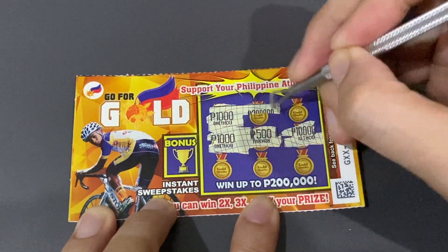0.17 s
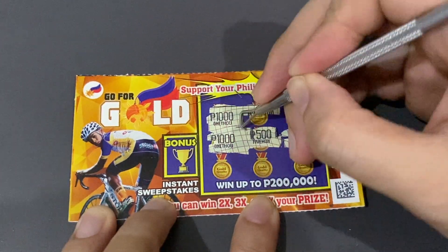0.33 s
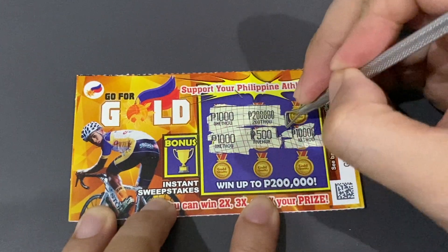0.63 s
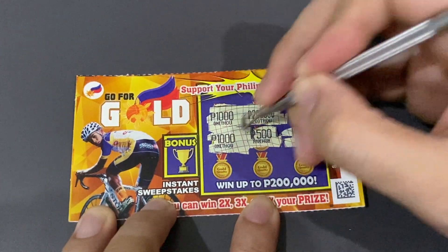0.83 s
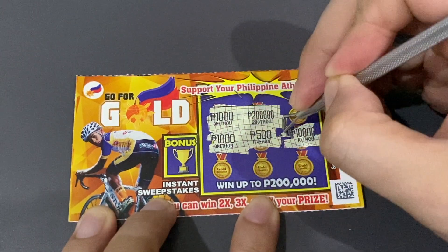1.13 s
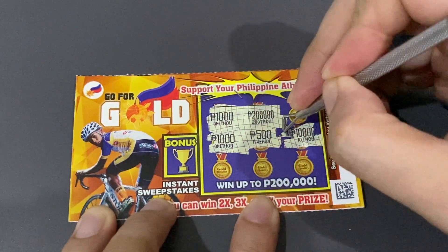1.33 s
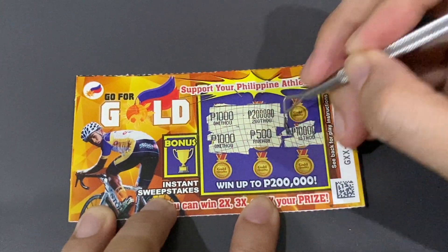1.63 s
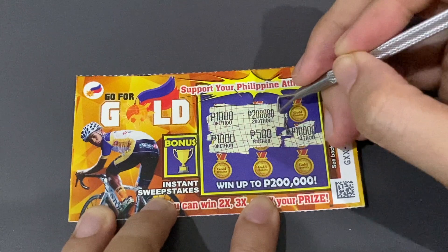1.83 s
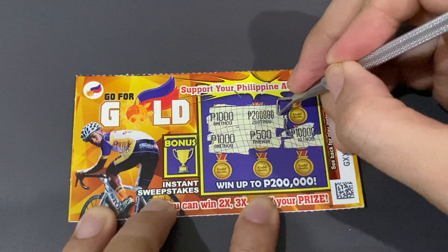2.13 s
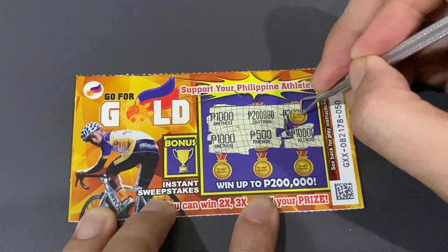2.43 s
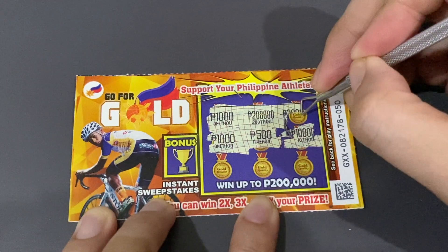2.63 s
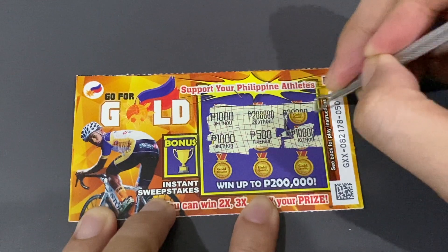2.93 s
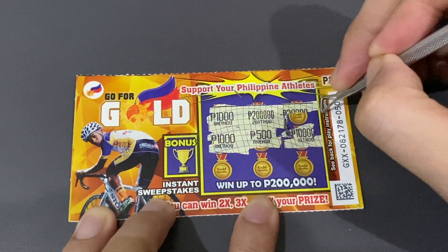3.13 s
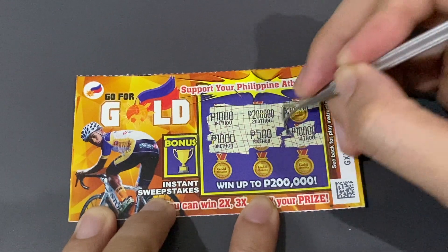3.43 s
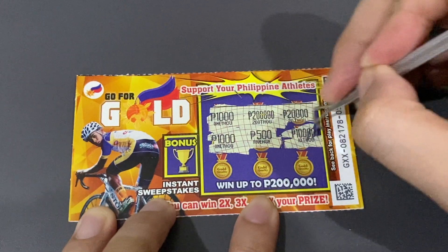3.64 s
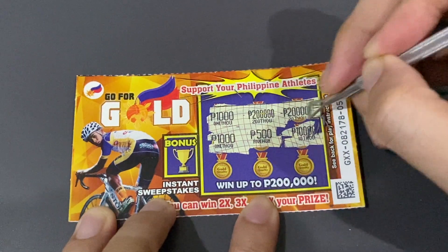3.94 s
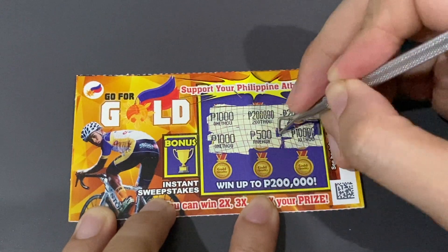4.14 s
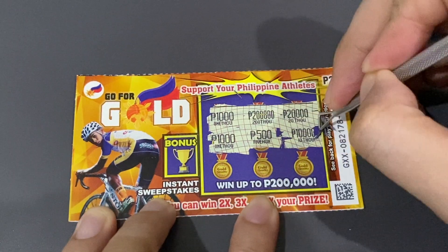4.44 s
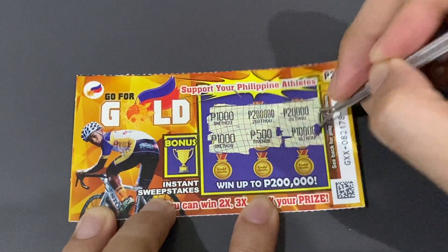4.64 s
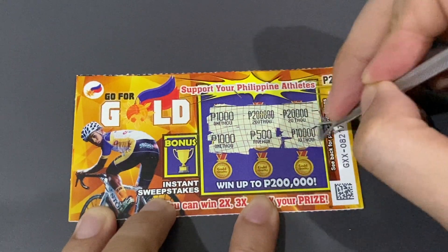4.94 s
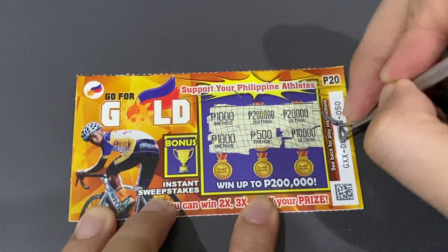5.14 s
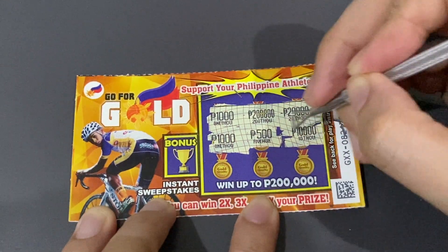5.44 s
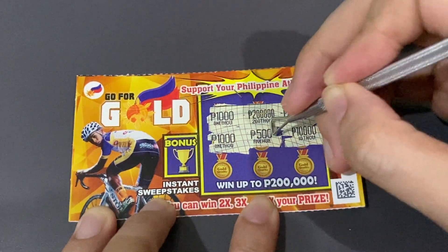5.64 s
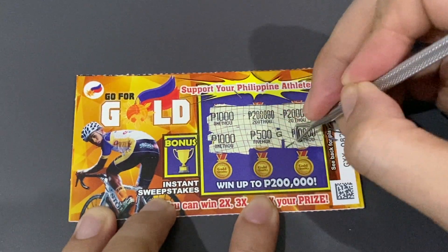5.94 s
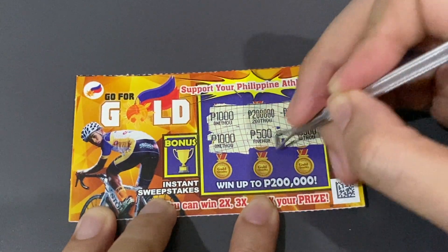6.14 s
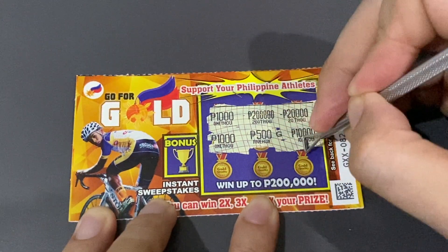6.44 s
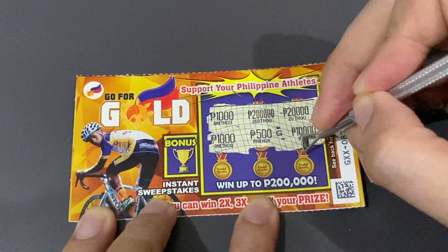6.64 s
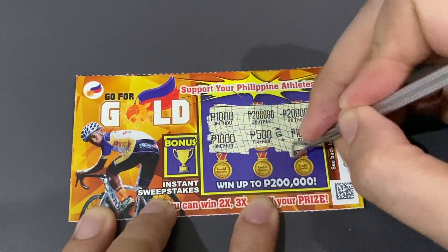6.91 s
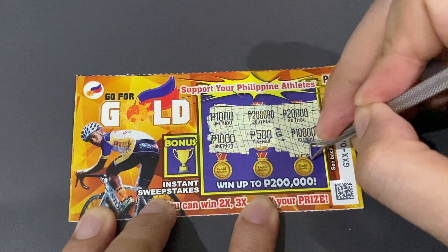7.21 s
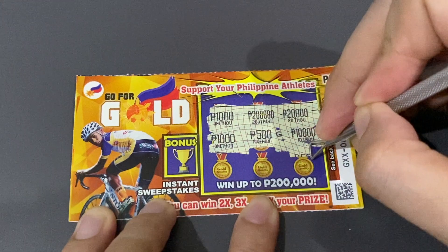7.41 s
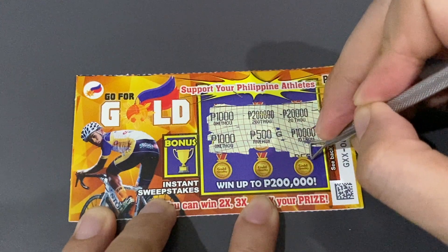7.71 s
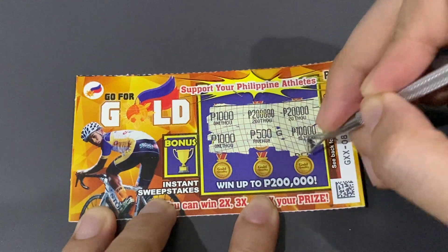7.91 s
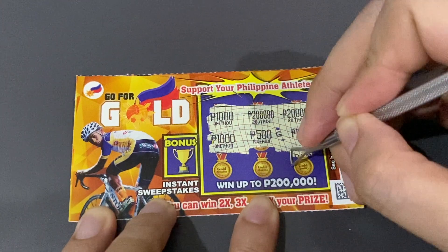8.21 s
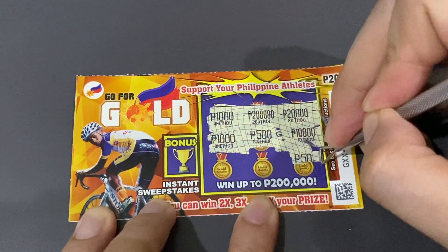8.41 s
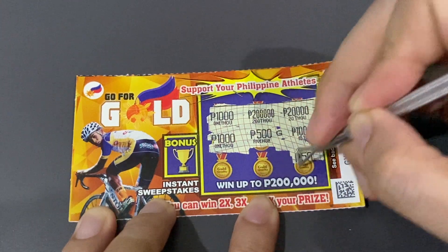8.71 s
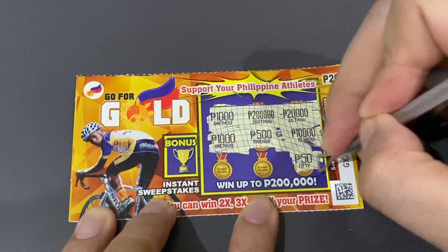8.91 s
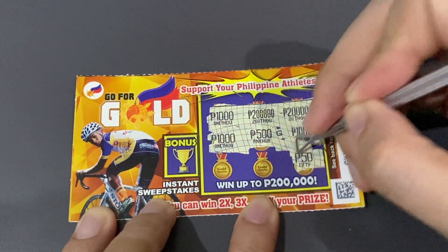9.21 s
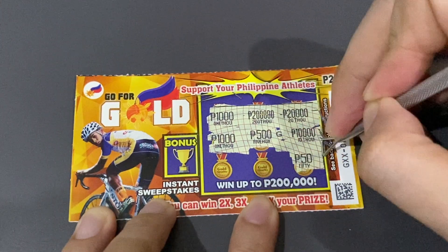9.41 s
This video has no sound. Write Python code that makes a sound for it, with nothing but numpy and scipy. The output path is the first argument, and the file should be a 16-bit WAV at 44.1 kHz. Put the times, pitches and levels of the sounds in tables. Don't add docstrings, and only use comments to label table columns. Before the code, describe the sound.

A steel tool scratches coating off a card in short irregular strokes, with ticks and small table knocks, over a low indoor hum.

```python
import sys
import numpy as np
from scipy import signal
from scipy.fft import rfft, irfft, next_fast_len
from scipy.io import wavfile
from scipy.ndimage import uniform_filter1d, map_coordinates

SR = 44100
rng = np.random.default_rng(int(sys.argv[2]) if len(sys.argv) > 2 else 0)


def bounce(signal):
    frames = np.transpose(np.atleast_2d(signal))
    limited = np.clip(frames, -1, 1)
    pcm = np.round(limited * 32767).astype(np.int16)
    wavfile.write(sys.argv[1], SR, pcm)


def boost(x):
    u = np.asarray(x, float) / 20
    return 10 ** u


N = 421596


def unit(x):
    return x / np.sqrt(np.mean(x ** 2) + 1e-20)


def along(points, hz):
    f, v = np.transpose(points)
    return np.interp(np.log(hz + 1), np.log(f + 1), v)


def wobble(rate):
    knots = rng.standard_normal(int(N * rate / SR) + 4)
    return map_coordinates(knots, [np.arange(N) * rate / SR])


def filtered(x, response):
    m = next_fast_len(N + SR // 2)
    return irfft(rfft(x, m) * response(np.fft.rfftfreq(m, 1 / SR)), m)[..., :N]


def spread(pair, alike):
    def turn(hz):
        return np.arccos(np.clip(along(alike, hz), -1, 1)) / 2

    mid, side = filtered(pair, lambda hz: np.array([np.cos(turn(hz)), np.sin(turn(hz))]))
    return np.array([mid + side, mid - side])


def hum():
    # start_s, rumble_db
    traffic = [
        (0.0, -62),
        (0.29, -46.5),
        (0.4, -49.5),
        (2.34, -55.5),
        (4.55, -51.5),
        (7.0, -52.5),
        (7.11, -56.5),
        (9.29, -55),
        (9.56, -57),
    ]
    # pitch_hz, level_db (per Hz)
    rumble_colour = [(12, -25), (20, -13), (49, 6), (61, -2.5), (75, -6), (100, -16.5), (130, -39.5),
                     (220, -120)]
    drone_colour = [(41, -48), (70, -19), (124, -3), (182, -14), (281, -18), (347, -23.5), (441, -24),
                    (701, -40.5), (755, -38), (1480, -48.5), (2500, -64.5), (3250, -91), (5500, -120)]
    hiss_colour = [(880, -31), (1500, -10.5), (2530, -8.5), (3150, -10), (7840, -12), (12000, -16.5),
                   (13000, -31), (14000, -70)]
    # pitch_hz, likeness (1 = the same)
    far_alike = [(60, 0.99), (130, 0.92), (290, 0.61), (640, 0.09), (1400, 0.29), (2500, 0.94),
                 (6800, 0.96)]

    def rush(colour):
        noise = filtered(rng.standard_normal((2, N)), lambda hz: boost(along(colour, hz)))
        return unit(spread(noise, far_alike))

    t = np.arange(N) / SR
    rumble_db = np.interp(t, *np.transpose(traffic)) + 8.5 + 0.92 * wobble(2.1)
    drone_db = -47.5 + 0.143 * t + 3.5 + 1.53 * wobble(5)
    hiss_db = -80 + 0.5
    rumble = boost(rumble_db) * rush(rumble_colour)
    drone = boost(drone_db) * rush(drone_colour)
    return rumble + drone + boost(hiss_db) * rush(hiss_colour)


def ticks():
    # start_s, peak_db, ring_hz
    grazes = [(0.0741, -34.5, 9900), (0.0857, -31.5, 5700), (1.5102, -43, 4330), (1.536, -44, 5550),
              (3.052, -49, 10600), (3.061, -50, 11000), (4.5744, -53, 12400), (5.164, -59, 8400),
              (5.641, -52, 5600), (5.654, -52, 5500), (6.005, -58, 5500), (4.6003, -52, 5800),
              (4.6204, -47.5, 6000), (5.2051, -53, 5900), (5.232, -55, 5750), (5.6292, -49.5, 5850),
              (5.9438, -36, 11500), (6.594, -54, 5670), (7.7835, -28.5, 7140), (8.5967, -48, 5530),
              (9.045, -48, 10200), (9.497, -56, 10500), (8.565, -51, 4000), (9.058, -50.5, 6300),
              (9.0882, -48, 5840), (9.5404, -52, 5700)]
    # start_s, peak_db, ring_hz, card_db
    touches = [(0.2576, -46, 5740, -4), (0.2623, -29.5, 5400, -9), (0.6402, -34.5, 7600, -10),
               (0.8103, -40, 6320, -4), (0.814, -29, 5240, -9), (1.2413, -47.5, 10200, 4),
               (1.8217, -24.5, 7300, -12.5), (2.141, -39, 4000, 0), (2.818, -54, 11000, -10),
               (3.2064, -38.5, 8650, -10), (3.4006, -34.5, 5040, -4.5), (3.4134, -28, 4260, -6),
               (3.8431, -36.5, 7640, -8.5), (4.055, -27.5, 5500, -6), (4.7534, -43, 5640, 3.5),
               (4.774, -30.5, 11300, -7.5), (6.126, -41, 5210, 1), (6.132, -32, 6500, -8),
               (6.5478, -52.5, 4050, 10), (6.7154, -19.5, 5650, -9.5), (6.7254, -51, 5820, -8.5),
               (8.0949, -33.5, 5640, -10.5), (8.124, -42, 5870, -2), (8.5535, -43.5, 9600, -12.5),
               (8.706, -41, 5880, 6.5), (9.1747, -33, 5260, -5), (9.1854, -32.5, 10700, -1)]
    # start_s, peak_db, ring_hz
    chatter = [(0.271, -38, 11300), (0.2957, -47, 10900), (0.314, -50, 10500), (0.346, -46, 9500),
               (2.144, -34, 10500), (2.901, -42, 11000), (4.158, -56, 9000), (4.908, -61, 9400),
               (5.05, -52, 11400), (0.8244, -48, 6300), (0.8485, -42, 9640), (1.8354, -45, 7320),
               (4.0756, -34.5, 11400), (4.1004, -38, 11400), (4.111, -39.5, 11400), (5.677, -42, 7470),
               (5.7113, -41, 7500), (6.1396, -26, 7100), (6.1664, -51, 6720), (6.194, -36.5, 7360),
               (6.742, -34, 7460), (6.7584, -42, 7010), (6.772, -46, 8210), (8.1537, -45.5, 7920),
               (8.7136, -27, 10100), (8.7284, -31, 8750), (8.7404, -49, 7140), (8.751, -44, 8710),
               (9.1958, -32.5, 10100), (9.2124, -35, 10300)]
    contacts = [(*row, 0) for row in touches]
    contacts += [(*row, -45, 0) for row in chatter]
    contacts += [(*row, -31, -11) for row in grazes]

    out = np.zeros(N + SR)
    t = np.arange(SR // 10) / SR
    card_band = signal.butter(2, [1400, 3600], "band", fs=SR)
    crack_band = signal.butter(2, [4200, 15000], "band", fs=SR)
    shape = boost(-60 * t / 0.0094) + 0.029 * boost(-60 * t / 0.093)
    for start_s, peak_db, ring_hz, card_db, crack_db in contacts:
        noise = rng.standard_normal((3, len(t))) * (1 - np.exp(-t / 0.00096)) * shape
        ring = 1.88 * signal.lfilter(*signal.iirpeak(ring_hz, 3.5, SR), noise[0])
        crack = 0.57 * boost(crack_db) * signal.lfilter(*crack_band, noise[1])
        card = 2.2 * boost(card_db) * signal.lfilter(*card_band, noise[2])
        out[round(start_s * SR):][:len(t)] += boost(peak_db + 3.5) * (ring + crack + card)
    return out[:N]


def knocks():
    # start_s, peak_db, hardness_db, snap_db
    blows = [(0.263, -22.5, -16.5, -21), (0.814, -21.5, -13.5, -21), (1.836, -31, -18, -26),
             (3.414, -22.5, -14.5, -15), (4.071, -26.5, -17, -34), (4.771, -24, -12.5, -17),
             (5.674, -33.5, -18, -24), (6.132, -23.5, -11.5, -15), (6.726, -26, -6, -9),
             (8.123, -30, -16, -20.5), (8.713, -23.5, -4, -3.5), (9.185, -23.5, -9, -29)]
    # pitch_hz, level_db, t60_s (time to die by 60 dB)
    table_tones = [(304.8, 6, 0.054), (364.5, -4, 0.1), (428.5, 3, 0.032), (527.5, -4, 0.11),
                   (730, 2, 0.044), (886, 4.5, 0.016), (1026, -2, 0.043), (1263, -2.5, 0.018),
                   (1720, -21.5, 0.032), (2210, -8.5, 0.017), (2730, -10, 0.0083)]
    out = np.zeros(N + SR)
    t = np.arange(SR // 5) / SR
    dull_band = signal.butter(2, [230, 900], "band", fs=SR)
    for start_s, peak_db, hard_db, snap_db in blows:
        dull = signal.lfilter(*dull_band, rng.standard_normal(len(t)))
        thud = 1.99 * boost(-60 * t / 0.072) * dull * (1 - np.exp(-t / 0.0012))
        blow_curve = [0, hard_db + 10, hard_db + 3.5, snap_db + 11.5]
        for hz, level_db, t60_s in table_tones:
            blow_db = np.interp(hz, [540, 855, 1400, 1910], blow_curve)
            rise = 1 - np.exp(-t * hz / 1.06)
            pitch_hz = hz * (1 + 0.022 * rng.standard_normal())
            tone_db = level_db + blow_db + rng.normal(0, 2.1) - 60 * t / t60_s
            thud += boost(tone_db) * rise * np.sin(2 * np.pi * pitch_hz * t)
        cycles = 1100 * 0.00383 * (1 - np.exp(-t / 0.00352))
        wave_gain = 0.96 * (1 - np.exp(-t / 0.0007)) * boost(hard_db + 14.0 - 60 * t / 0.025)
        thud += wave_gain * np.sin(2 * np.pi * cycles)
        out[round((start_s + .0015) * SR):][:len(t)] += boost(peak_db - 3) * thud
    return out[:N]


def effort():
    # start_s, speeding_up_s, slowing_down_s, top_level_db, edge_hiss_db (over the top)
    strokes = [(0.333, .08, 0.091, -34.5, -8), (0.862, 0.066, 0.072, -39, -2),
               (3.481, 0.052, 0.096, -36, -8.5), (4.13, 0.12, 0.04, -36, -8.5),
               (4.828, 0.044, 0.048, -42.5, -14.5), (5.734, .04, 0.058, -40.5, -1.5),
               (6.195, 0.039, 0.018, -45, -14), (6.264, 0.022, 0.079, -43, -12),
               (6.849, 0.037, 0.11, -49, -18), (8.22, 0.062, 0.056, -36.5, -10.5),
               (8.783, 0.044, 0.065, -37, -9.5), (9.226, 0.046, 0.064, -38.5, -6)]
    returns = [
        (2.135, 0.0033, 0.12, -47.5, -14.5),
        (2.814, 0.074, 0.025, -44.5, -15),
        (4.997, 0.021, 0.037, -48, -6),
    ]
    brushes = [
        (1.2, 0.047, 0.09, -70, 4.5),
        (1.34, 0.089, 0.22, -71, -20),
        (2.2, .04, 0.18, -65.5, -35),
        (5.62, .06, 0.045, -80, 12),
        (6.14, 0.025, .04, -68, 4),
        (6.735, .005, 0.083, -70, 5.5),
        (7.65, .02, 0.06, -72, -22),
        (8.73, .005, 0.05, -62, -7),
    ]
    press_db = -47
    rows = [(*row, press_db + 0.29 * (row[3] - press_db), -17) for row in strokes]
    rows += [(*row, -43, -7.5) for row in returns]
    rows += [(*row, row[3] + 4, -17) for row in brushes]

    gains = np.zeros((3, N))
    for start_s, rise_s, fall_s, top_db, edge_db, press_db, start_db in rows:
        t = np.arange(round((rise_s + fall_s + .14) * SR)) / SR
        after = np.clip(t - rise_s - fall_s, 0, None)
        speed_db = start_db * np.clip(1 - t / rise_s, 0, 1) ** 2.4
        speed_db += -13 * np.clip((t - rise_s) / fall_s, 0, 1) ** 1.51
        stop_db = -14.5 * np.clip(after / 0.009, 0, 1) - 220 * after
        lift = np.clip(np.minimum(t, t[-1] - t) / 0.0046, 0, 1)
        card_db = top_db + speed_db + 1.1 * stop_db
        hiss_db = top_db + edge_db + 1.49 * speed_db + 1.4 * stop_db
        table_db = press_db + 0.51 * speed_db + stop_db
        gains[:, round(start_s * SR):][:, :len(t)] += lift * boost([card_db, hiss_db, table_db])
    return gains


def drag():
    # pitch_hz, width_hz, level_db
    card_tones = [(713.7, 22, 3), (830.3, 51, 0.5), (1026, 60.6, 4.5), (1386, 61, 2.5), (1596, 100, -5),
                  (1751, 23.4, 1.5), (2002, 177, -5.5), (2604, 78, -1.5), (2888, 108, -2),
                  (3240, 240, -6.5), (4076, 65, -3), (5650, 410, -3.5), (6530, 440, -11), (7790, 740, -4),
                  (8980, 330, -2.5), (11640, 860, -2)]
    # pitch_hz, level_db
    body_colour = [(800, -32), (1300, 0.5), (2000, -2.5), (3250, -3), (3500, 5), (4200, -15.5),
                   (6000, -40.5)]
    edge_colour = [(3300, -8), (4200, 5.5), (6500, 5.5), (8200, -2), (9700, 12.5), (12000, -4.5),
                   (13400, 10.5), (14800, -1), (15800, 5), (16200, -39)]
    weight_colour = [(350, -38), (550, 10), (750, -3), (1000, -5), (1400, -5.5), (1800, -33)]

    def ring(f):
        total = .16
        for k, (c, w, db) in enumerate(card_tones):
            total = total + (-1) ** k * boost(db) * 1j * f * w / (c * c - f * f + 1j * f * w)
        return total

    judder = wobble(70)
    colours = (body_colour, edge_colour, weight_colour)
    out = np.zeros(N)
    for gain, colour, trim_db, rough_db in zip(effort(), colours, (13.5, 6.5, 18.5), (1.5, 2.2, 1.6)):
        hz, t, z = signal.stft(rng.standard_normal(N), SR, nperseg=256)
        patches = uniform_filter1d(rng.standard_normal(z.shape), size=4, axis=0)
        patches = uniform_filter1d(patches, size=8, axis=1)
        slips = signal.istft(z * boost(2.4 * unit(patches)), SR, nperseg=256)[1][:N]
        slips = unit(slips * boost(rough_db * wobble(400) + 1.35 * judder))
        out += filtered(gain * boost(trim_db) * slips, lambda f: ring(f) * boost(along(colour, f)))
    return out


def tail(t60, seconds):
    hz, t, z = signal.stft(rng.standard_normal((2, int(seconds * SR))), SR, nperseg=128)
    tails = signal.istft(z * boost(-60 * t / along(t60, hz)[:, None]), SR, nperseg=128)[1]
    return tails / np.linalg.norm(tails[0])


def ports(x):
    # pitch_hz, lead_radians
    lead = [(300, 0), (860, .7), (1800, -.2), (3100, .6), (5900, -.2), (7750, 0), (8350, 2), (9200, 1.9),
            (10400, .1), (11500, -.2), (12700, -3.12), (14300, -3.16), (14900, -6)]

    def response(hz):
        phase = along(lead, hz) * np.array([[.5], [-.5]])
        return np.exp(1j * phase) / (1 + (hz / 16050) ** 120) / (1 + (27 / (hz + 1)) ** 4)

    return filtered(x, response)


def scene():
    # pitch_hz, t60_s
    room = [(300, 0.53), (2000, 0.3), (10000, 0.18)]
    # pitch_hz, likeness (1 = the same)
    near_alike = [(300, 0.94), (640, 0.3), (1400, 0.9), (3100, 0.98), (5000, 0.92), (11000, 1),
                  (14000, 0.87)]
    # pitch_hz, lean_db
    lean = [(300, .4), (700, 4), (1300, .8), (2400, 0)]
    background = hum()
    tool = ticks() + knocks() + drag()
    late = np.pad(tool, (300, 0))
    answer = signal.fftconvolve(late[None], tail(room, .5), axes=1)[:, :N]
    askew = filtered(tool, lambda hz: 1j * np.sqrt(2) * np.cos(2 * np.pi * hz * .0017))
    pair = np.array([tool + boost(-13.0) * answer[0], askew + boost(-10) * answer[1]])
    near = spread(pair, near_alike)
    return filtered(near, lambda hz: boost(along(lean, hz) * np.array([[.5], [-.5]]))) + background


def top_cut(x):
    return signal.sosfilt(signal.butter(12, 16960, fs=SR, output="sos"), x)


def record(dry):
    mix = ports(dry)
    return top_cut(mix)


dry = scene()
out = record(dry)
bounce(out)
```